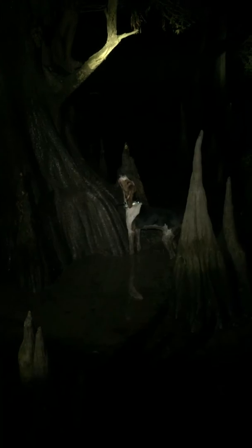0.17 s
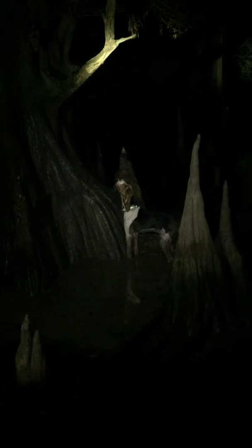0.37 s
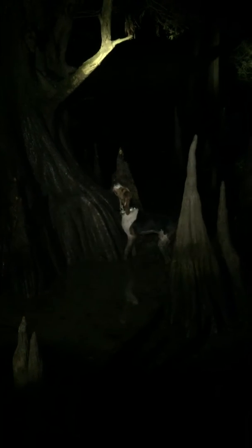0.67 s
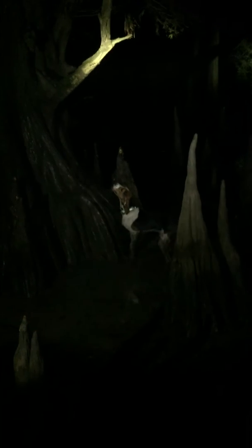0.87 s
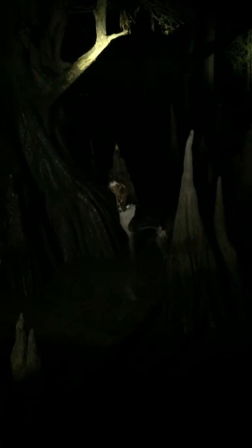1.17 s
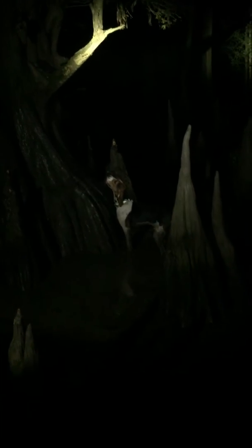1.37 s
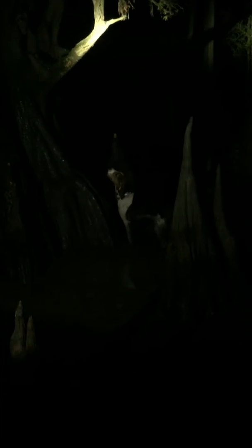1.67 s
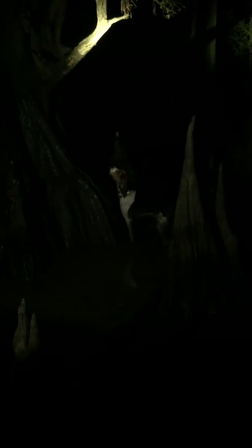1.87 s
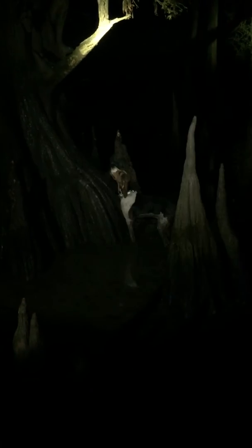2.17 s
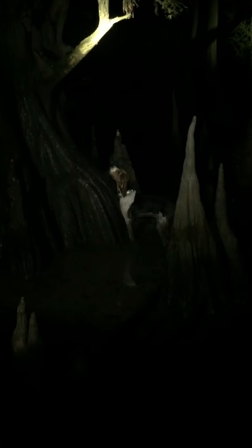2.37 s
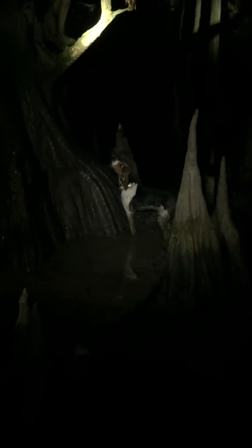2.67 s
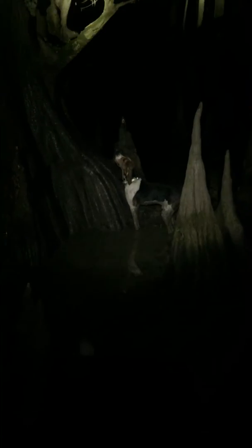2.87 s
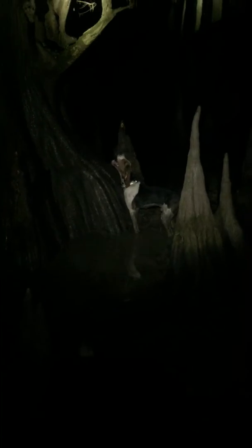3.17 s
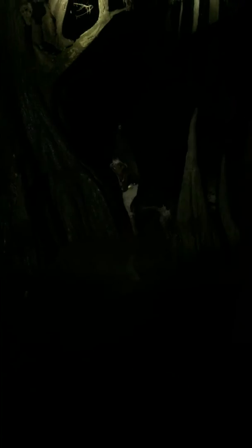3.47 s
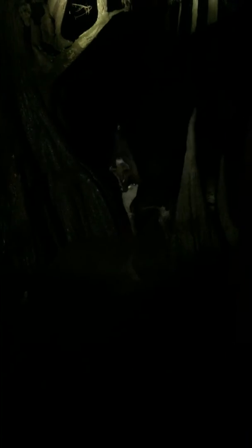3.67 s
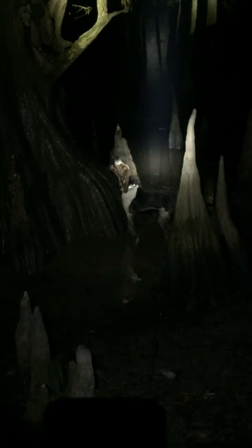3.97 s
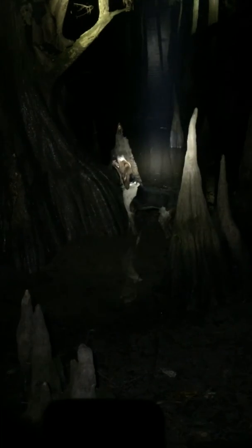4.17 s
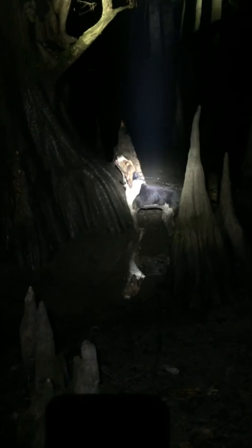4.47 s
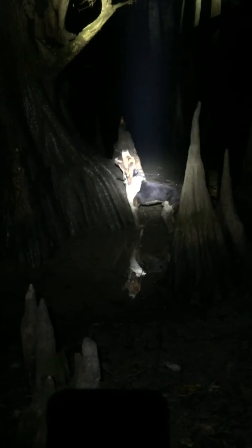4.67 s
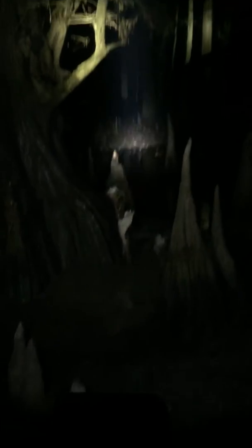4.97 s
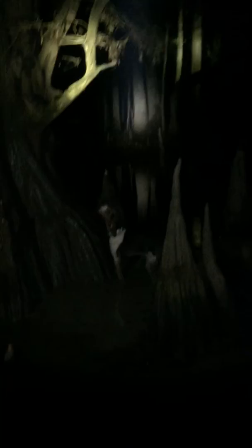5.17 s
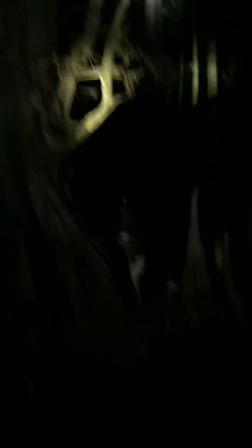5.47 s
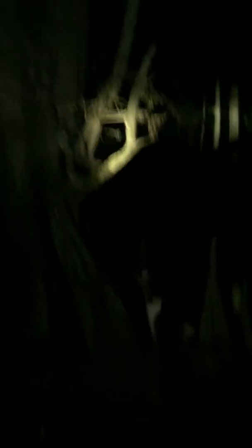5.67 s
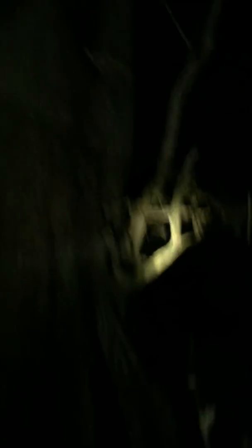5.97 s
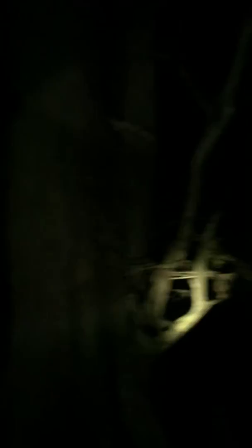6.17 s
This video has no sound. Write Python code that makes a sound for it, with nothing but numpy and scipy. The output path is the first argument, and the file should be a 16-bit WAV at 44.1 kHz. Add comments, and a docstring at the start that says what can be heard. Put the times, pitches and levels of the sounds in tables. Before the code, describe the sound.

Outdoors at night in flooded woods, a single hound is heard some metres from a simple mono microphone. A bark's echo dies away, a quiet wavering howl follows, then insects, air hiss and tiny ticks fill a pause. Five forceful barks come in the second half, unevenly spaced, each cracking into a rough shout-like body and a short falling groan, with echo washing through the trees and insects dipping beneath.

```python
"""Opens on an earlier bark's dying echo in a flooded forest at night, under insect bands, hiss, rumble and ticks.
A hound howls softly from 0.5 to 1.4 s, cracking between plain and period-doubled tone.
From 3 s, after a thin squeak, it barks five times: lead-in, crack, surge, arched hoarse body, short groan.
Vocal-fold harmonics and breath noise pass a mouth filter; decaying noise gives the echo of trunks and water.
Gain control ducks everything under loud barks and recovers steadily."""
import sys
import numpy as np
from scipy import signal
from scipy.fft import rfft, irfft
from scipy.io import wavfile
from scipy.ndimage import uniform_filter1d, minimum_filter1d

SR = 44100
rng = np.random.default_rng(int(sys.argv[2]) if len(sys.argv) > 2 else 0)


def master_out(mix):
    """Clip the mix to full scale and print it as 16-bit PCM to the path in sys.argv[1]."""
    frames = np.transpose(np.atleast_2d(mix))
    ceiling = np.clip(frames, -1, 1)
    pcm = np.round(ceiling * 32767).astype(np.int16)
    wavfile.write(sys.argv[1], SR, pcm)


N = 278640
TIME_S = np.arange(N) / SR

# Night-air hiss spectrum. Each row: frequency in Hz, relative density in dB per Hz.
AIR_SPECTRUM = [(100, 4), (550, -4.5), (900, -12.5), (1500, -17), (3000, -14), (6000, -17), (8000, -21.5),
                (15000, -28)]
# Low rumble spectrum. Each row: frequency in Hz, relative density in dB per Hz.
RUMBLE_SPECTRUM = [(20, -25), (50, -7), (85, 0.5), (140, -9), (280, -24.5), (600, -36.5), (2000, -73)]
# Rumble dying down. Each row: time in seconds, mean level in dB.
RUMBLE_LEVEL_DB = [(0, -58.5), (1.2, -60), (3, -59), (4.4, -61), (5.2, -66.5), (6.3, -74)]
# Insect choirs. Each row: centre in Hz, width in Hz, mean level in dB, wing-stroke pulsing depth (0-1).
INSECT_BANDS = [(2262, 190, -66, 0.1), (1810, 110, -78.5, 0.24), (3843, 212, -56.5, 0.11),
                (4605, 436, -61.5, 0.2), (9530, 490, -82, 0.87)]
# Nearer insect. Each row: time in seconds, level in dB.
NEAR_INSECT_DB = [(0, -78), (2.38, -92), (2.5, -55), (2.8, -56.5), (2.92, -80), (5.0, -73), (5.3, -50.5),
                  (5.6, -72)]
# Drops and small ticks. Each row: start in seconds, nominal peak in dB, ring in Hz, decay in seconds.
TICK_EVENTS = [(0.202, -50, 10340, 0.0015), (1.125, -45, 6620, 0.004), (1.231, -52.5, 8170, 0.0063),
               (1.66, -61, 6960, 0.0027), (2.23, -56, 5720, .004), (3.425, -47, 9900, .0015),
               (6.205, -43, 9000, 0.00051), (6.213, -37, 4900, 0.0013)]
# Forest echo filter. Each row: frequency in Hz, gain in dB.
FOREST_FILTER = [(150, -1.5), (380, -6.5), (600, -1.5), (780, -11.5), (1100, -3.5), (2000, -2), (3500, 2),
                 (6000, -5), (12000, -27)]
# Throat and mouth, wide open for a bark. Each row: frequency in Hz, gain in dB.
OPEN_MOUTH_FILTER = [(180, -51.5), (360, -16), (480, -14.5), (610, 2.5), (760, 3.5), (880, -6.5),
                     (1120, -3), (1330, -13), (1550, -7.5), (1850, -14.5), (2300, -32), (3000, -53),
                     (4200, -51.5), (15000, -101)]
# Throat and mouth, half closed for the howl. Each row: frequency in Hz, gain in dB.
HALF_CLOSED_FILTER = [(150, -25), (340, 0.5), (460, 2.5), (570, 4.5), (760, 3), (900, -10), (1130, -13),
                      (1400, -14.5), (1720, -1.5), (2200, -28), (3000, -25.5), (4500, -71), (12000, -83)]
# Air rushing past the teeth. Each row: frequency in Hz, gain in dB.
RUSH_FILTER = [(1500, -25.5), (2600, -17.5), (3100, -3), (3700, -19.5), (4500, -11.5), (5300, 4),
               (5900, -2), (6800, -4.5), (7900, -15), (8900, -8), (10000, -19), (11300, -13), (15000, -21)]
# Throat turbulence, weak near the main tone, strong above. Each row: frequency in Hz, gain in dB.
RASP_FILTER = [(400, -5), (750, -6.5), (1050, 0.5), (1900, 3), (2700, 7)]
# Howl. Each row: time in seconds, main-tone pitch in Hz, level in dB before HOWL_GAIN_DB.
HOWL_CURVE = [(0.47, 470, -41), (0.492, 481, -36.5), (0.506, 553.4, -33.5), (0.54, 572.6, -32.5),
              (0.572, 745, -35.5), (0.658, 774.4, -32.5), (0.754, 734, -37), (0.786, 686.3, -37.5),
              (0.862, 652.6, -33.5), (0.902, 637, -35), (0.954, 718, -41.5), (0.976, 553, -30.5),
              (1.192, 572, -30), (1.31, 561.6, -35.5), (1.33, 625, -33), (1.364, 540, -49),
              (1.41, 362.4, -49)]
# Howl register flips. Each row: centre in seconds, half-width in seconds, added hoarseness (0-1).
HOWL_CRACKS = [(0.541, 0.032, 0.82), (0.962, .013, 0.54), (1.34, 0.035, .55)]
# Barks. Each row: start in s, attack in s, lead-in length in s, surge delay after the crack in s,
# body length in s, lead-in pitch in Hz, crack pitch in Hz, top pitch in Hz, lead-in level in dB,
# surge level in dB, body level in dB before sag, last push in dB, lead-in hoarseness (0-1),
# body hoarseness (0-1), strength of the body's half-pitch lines (0-1).
BARK_EVENTS = [(3.014, 0.015, 0.047, 0.037, 0.16, 774.5, 659.2, 767, -16.5, 9, 12, 1, 0, 0.06, 1.),
               (3.719, 0.008, 0.039, .019, .132, 673.5, 624, 757.4, -0.5, 12, 10.5, -0.5, 0.23, 0.19, 0.66),
               (4.023, 0.051, .082, 0.03, .127, 611.3, 638, 734.4, -3, 2, 6.5, 0, .08, 0.03, 0.37),
               (4.702, 0.031, .046, 0.025, .130, 690.8, 655.3, 752.8, 0.5, 3, 9.5, -1, 0.67, 0.43, 0.76),
               (5.562, 0.0075, 0.038, 0.02, 0.15, 646.2, 623.4, 771.7, -2.5, 13, 9, 6.5, 0.74, 0.32, 0.92)]

TOP_HZ = 15750
HOWL_GAIN_DB, HOWL_HOARSE = -0.9, 0.053  # hoarseness between cracks
PLAIN_DOUBLING, DOUBLED_DOUBLING = 0.1, 1.19  # half-pitch strength in the two registers
LEAD_RISE = 0.1007  # share by which the lead-in pitch strains upward
# The voice cracks, falters, then climbs to the top pitch.
CRACK_S, RECOVER_S, CRACK_DB, CRACK_HOARSE = 0.01214, 0.034, -5, 0.96
BODY_DELAY_S, BODY_RISE_S = 0.011, 0.013
SURGE_S, SURGE_PURITY = 0.017, 0.65  # the hardest push clears the tone
SAG_DB_PER_S = 77  # the body loses force
PUSH_AHEAD_S, PUSH_S = 0.0055, 0.013  # last push before the jaw shuts
# The folds slacken before the close and the pitch slides down.
SLACK_AHEAD_S, SLACK_KNEE_S, SLACK_FALL_S = 0.021, 0.011, 0.1
# The jaw shuts on a short groan.
CLOSE_S, CLOSE_DB, TAIL_DB_PER_S, TAIL_S = 0.0037, -12, 169.5, 0.1
TAIL_HOARSE, TAIL_DOUBLING = 0.31, 0.9
GAP_DELAY_S, GAP_S, GAP_DB = 0.016, 0.011, -6.5  # dip between body and groan
# The falling groan swells as it passes the mouth's resonance.
GROAN_DELAY_S, GROAN_S, GROAN_DB = 0.026, 0.0078, 8


def amp(db):
    """Decibels to gain."""
    return 10 ** (np.asarray(db) / 20)


def unit(x):
    """Scale to rms 1."""
    return x / np.sqrt(np.mean(x ** 2))


def power(x, seconds):
    """Mean square, smoothed twice."""
    size = max(int(seconds * SR), 2)
    return np.maximum(uniform_filter1d(uniform_filter1d(x ** 2, size), size), 1e-14)


def bump(t_s, width_s):
    """Bell of height 1 around t = 0."""
    return np.exp(-(t_s / width_s) ** 2)


def step(t_s, width_s):
    """Smooth rise from 0 to 1 around t = 0."""
    return 0.5 + 0.5 * np.tanh(t_s / width_s)


def colour(x, points):
    """Minimum-phase filter through (Hz, dB) points."""
    hz, db = np.transpose(points)
    size = 2048
    bin_hz = np.arange(size // 2 + 1) * SR / size
    log_gain = np.log(amp(np.interp(np.log(bin_hz + 1), np.log(hz), db)))
    # folding the cepstrum makes the filter causal
    cepstrum = irfft(log_gain)
    cepstrum[1:size // 2] *= 2
    cepstrum[size // 2 + 1:] = 0
    impulse = irfft(np.exp(rfft(cepstrum)))
    return signal.fftconvolve(x, impulse)[:len(x)]


def band(count, hz, width_hz):
    """Bell-band noise, rms 1 before cropping to count; centred on 0 Hz it is a slow random wander."""
    f_hz = np.arange(N // 2 + 1) * SR / N
    spectrum = rfft(rng.standard_normal(N)) * bump(f_hz - hz, width_hz)
    return unit(irfft(spectrum, N))[:count]


def night_air():
    """A wavering low-noise rumble under steady filtered-noise hiss."""
    rumble_db = np.interp(TIME_S, *np.transpose(RUMBLE_LEVEL_DB)) + 4.3 * band(N, 0, 14.0)
    rumble = unit(colour(rng.standard_normal(N), RUMBLE_SPECTRUM)) * amp(rumble_db)
    hiss = unit(colour(rng.standard_normal(N), AIR_SPECTRUM)) * amp(-67.5)
    return rumble + hiss


def insects(stroke_hz):
    """Many far insects blur into noise bands pulsed by wing strokes, one band deeply; a nearer one joins."""
    wandering_hz = stroke_hz * (1 + 0.0044 * band(N, 0, 5.1))
    stroke = np.cos(2 * np.pi * np.cumsum(wandering_hz) / SR)
    out = amp(np.interp(TIME_S, *np.transpose(NEAR_INSECT_DB))) * band(N, 3680, 200)
    for hz, width_hz, db, depth in INSECT_BANDS:
        choir = unit(band(N, hz, width_hz) * np.exp(depth * stroke))
        out = out + amp(db + 0.85 * band(N, 0, 2.7)) * choir
    return out


def ticks():
    """Each tick is a short burst of bright noise, sudden then decaying."""
    out = 0
    for start_s, peak_db, hz, decay_s in TICK_EVENTS:
        decay = np.exp(-np.abs(TIME_S - start_s) / decay_s) * (TIME_S >= start_s)
        # rms at half the nominal peak
        out = out + amp(peak_db) / 2 * band(N, hz, 2500) * decay
    return out


def forest(x, near_db, near_t60_s, far_db, far_t60_s):
    """Quick scatter from nearby trunks and the long wash of the whole wood, as decaying noise."""
    t_s = TIME_S[:3 * SR]
    near_decay = amp(-60 * t_s / near_t60_s) * (t_s > 0.006)
    far_decay = amp(-60 * t_s / far_t60_s) * (1 - np.exp(-t_s / 0.028))
    near = unit(rng.standard_normal(len(t_s)) * near_decay)
    far = unit(rng.standard_normal(len(t_s)) * far_decay)
    echo = colour(amp(near_db) * near + amp(far_db) * far, FOREST_FILTER)
    return signal.fftconvolve(x, echo / np.sqrt(len(t_s)))  # rings on past the end


def squeak(start_s, length_s, low_hz, high_hz, db):
    """A thin rising, unsteady sine that leads into the first bark."""
    progress = np.clip((TIME_S - start_s) / length_s, 0, 1)
    hz = low_hz + (high_hz - low_hz) * progress + 40 * band(N, 0, 200)
    return amp(db) * np.sin(np.pi * progress) * np.sin(2 * np.pi * np.cumsum(hz) / SR)


def voice(table, mouth, jitter, shimmer, rattle, rattle_hz, rasp_db, clear_rasp_db,
          bite_db, rush_db, closing_s, chest_db):
    """Uneven vocal-fold cycles and gated turbulence through the mouth, plus rushing air and a chest tone."""
    s, *columns = np.transpose(table)
    start, count = int(s[0] * SR), int((s[-1] - s[0]) * SR)
    t_s = TIME_S[:count]
    hz, db, hoarse, doubling = (np.interp(TIME_S[start:start + count], s, c) for c in columns)
    hoarse, doubling = np.clip(hoarse, 0, 1), np.abs(doubling)
    doubled = np.minimum(doubling, 1)

    # loose tissue rattles at its own slow rate and puts sidebands on every line
    flap_hz = rattle_hz * (1 + 0.095 * band(count, 0, 33))
    flap = np.cos(2 * np.pi * np.cumsum(flap_hz) / SR)
    hoarse_wobble = hoarse * (jitter * band(count, 0, 260) + 0.0075 * flap)
    hz = hz * (1 + hoarse_wobble + 0.0066 * band(count, 0, 50))
    phase = np.pi * np.cumsum(hz) / SR  # one turn per pair of cycles

    # strong and weak cycles alternate: odd k are the half-pitch lines
    closure = 0.81 + 0.068 * doubled
    folds = 0
    for k in range(1, 13):
        line_gain = doubling if k % 2 else closure ** (k / 2 - 1)
        folds = folds + line_gain * np.cos(k * phase)
    folds = folds * np.exp(hoarse * (rattle * flap + shimmer * band(count, 0, 380)))
    air = rng.standard_normal(count) * (1 + 0.28 * np.cos(phase)) * np.exp(0.5 * hoarse * flap)
    rasp = (amp(clear_rasp_db) + amp(rasp_db) * hoarse) * colour(air, RASP_FILTER)
    tone = colour(folds + rasp, mouth)
    tone = amp(db) * tone / np.sqrt(power(tone, 0.01))

    # the jaw starts wide for a harsh bite; as it closes, air buzzes past the teeth
    gape = bump(t_s, closing_s)
    bite = band(count, 2420, 1000) * amp(db + bite_db) * hoarse * gape
    buzz = unit(sum(np.cos(k * phase + 2 * np.pi * rng.random()) for k in range(7, 34)))
    loudest_db = db.max()
    effort_db = db - loudest_db
    rush = unit(colour(air * (0.9 + hoarse) + buzz * np.exp(0.55 * hoarse * flap), RUSH_FILTER))
    rush = rush * amp(loudest_db + rush_db + 1.016 * effort_db + 2.2 * band(count, 0, 45))
    rush = rush * (1.2 - gape) * (0.39 + 0.98 * doubled)

    # the chest tone stands out as the voice sinks away
    chest_level_db = loudest_db + chest_db + 0.35 * effort_db + 3.7 * band(count, 0, 40)
    chest = np.sin(phase) * doubled * amp(chest_level_db)
    fade = np.minimum(t_s / 0.002, 1) * np.minimum(t_s[::-1] / 0.03, 1)
    return np.pad((tone + bite + rush + chest) * fade, (start, N - start - count))


def howling():
    """Howl motion, hoarse around each register flip: rows of (s, Hz, dB, hoarseness, half-pitch strength)."""
    times_s, hz, db = np.transpose(HOWL_CURVE)
    s = np.arange(times_s[0], times_s[-1], 0.001)
    hoarse, doubled = HOWL_HOARSE, 0
    for k, (at_s, width_s, added) in enumerate(HOWL_CRACKS):
        hoarse = hoarse + added * bump(s - at_s, width_s)
        doubled = doubled + (-1) ** k * step(s - at_s, width_s / 2)
    doubling = PLAIN_DOUBLING + (DOUBLED_DOUBLING - PLAIN_DOUBLING) * doubled
    level_db = np.interp(s, times_s, db) + HOWL_GAIN_DB
    return np.column_stack([s, np.interp(s, times_s, hz), level_db, hoarse, doubling])


def bark(start_s, attack_s, lead_s, surge_delay_s, body_s, lead_hz, crack_hz, top_hz,
         lead_db, surge_db, body_db, push_db, lead_hoarse, body_hoarse, body_doubling):
    """Motion of one bark from lead-in to groan, in the howl's columns."""
    s = np.arange(start_s, start_s + lead_s + body_s + TAIL_S, 0.001)
    since_start = s - start_s
    since_crack = since_start - lead_s
    since_close = since_crack - body_s
    opened, closed = step(since_crack, CRACK_S / 2), step(since_close - CLOSE_S, CLOSE_S)
    surge = bump(since_crack - surge_delay_s, SURGE_S)
    push = bump(since_close + PUSH_AHEAD_S, PUSH_S)

    # pitch strains upward, drops at the crack, climbs to the top and slides away
    strained_hz = lead_hz * (1 + LEAD_RISE * (since_start / lead_s) ** 2)
    held_hz = np.where(since_crack < 0, strained_hz, top_hz)
    dip = np.exp(-(since_crack / np.where(since_crack < 0, CRACK_S, RECOVER_S)) ** 4)
    slack_s = SLACK_KNEE_S * np.logaddexp(0, (since_close + SLACK_AHEAD_S) / SLACK_KNEE_S)
    hz = (held_hz + (crack_hz - held_hz) * dip) * np.exp(-slack_s / SLACK_FALL_S)

    # the lead-in swells, the surge rides on the sagging body, the jaw cuts it off
    lead = amp(lead_db - 27.6 * np.maximum(1 - since_start / attack_s, 0)) * (1 - opened)
    body = amp(body_db - SAG_DB_PER_S * since_crack) * step(since_crack - BODY_DELAY_S, BODY_RISE_S)
    release_db = CLOSE_DB * closed - TAIL_DB_PER_S * np.maximum(since_close, 0)
    release_db = release_db + GAP_DB * bump(since_close - GAP_DELAY_S, GAP_S)
    accents_db = CRACK_DB * bump(since_crack, CRACK_S) + push_db * push
    accents_db = accents_db + GROAN_DB * bump(since_close - GROAN_DELAY_S, GROAN_S)
    db = 20 * np.log10(lead + body + amp(surge_db) * surge) + accents_db + release_db

    def blend(first, middle, last):
        """Cross-fade lead-in, body and groan."""
        return first * (1 - opened) + middle * (opened - closed) + last * closed

    # surge and last push clear the tone; a hoarse lead-in already has half-pitch lines
    impure = 1 - SURGE_PURITY * np.maximum(surge, push)
    hoarse = blend(lead_hoarse, body_hoarse, TAIL_HOARSE) + CRACK_HOARSE * bump(since_crack, CRACK_S)
    doubling = blend(0.57 * lead_hoarse, body_doubling, TAIL_DOUBLING)
    doubling = doubling * (1 - 0.51 * np.maximum(dip * opened, push))
    return np.column_stack([s, hz, db, hoarse * impure, doubling])


def hound():
    """Howl, barks and echoes; the late echo also opens the scene as an earlier bark dying away."""
    howl = voice(howling(), HALF_CLOSED_FILTER, jitter=0.14, shimmer=0.64, rattle=0.47, rattle_hz=90,
                 rasp_db=-21.5, clear_rasp_db=-8.0, bite_db=-9, rush_db=-38.5,
                 closing_s=0.051, chest_db=-8)
    barks = 0
    for row in BARK_EVENTS:
        barks = barks + voice(bark(*row), OPEN_MOUTH_FILTER, jitter=0.07, shimmer=0.79, rattle=0.78,
                              rattle_hz=131.5, rasp_db=17.5, clear_rasp_db=-7.5, bite_db=-25.5,
                              rush_db=-36.5, closing_s=0.061, chest_db=-45.5)
    echoes = forest(howl + barks, near_db=-6, near_t60_s=0.19, far_db=-25.5, far_t60_s=2.09)
    earlier = np.pad(echoes[int(6.0 * SR):], (0, N))[:N]
    return howl + barks + echoes[:N] + amp(-2.0) * earlier


def scene():
    """Air, insects, ticks and dog, in mono."""
    background = night_air() + insects(stroke_hz=58.3) + ticks()
    dog = squeak(start_s=2.982, length_s=0.044, low_hz=3840, high_hz=4050, db=-37.5) + hound()
    return (background + dog)[None]


def overload(x, ceiling_db):
    """Flattens the loudest peaks, the upper side slightly earlier, which adds a low thump."""
    ceiling = amp(ceiling_db) * np.where(x > 0, 0.95, 1.05)
    return x / (1 + (x / ceiling) ** 8) ** (1 / 8)


def gain_control(x, threshold_db, slope, release_db_per_s, start_cut_db):
    """Turns down at once when the sound is loud and recovers at a steady rate."""
    loudness_db = 10 * np.log10(power(x, 0.004))
    wanted_db = np.clip(slope, 0, 1) * np.maximum(loudness_db - threshold_db, 0)
    recovery_db = release_db_per_s * TIME_S
    held_db = np.maximum(np.maximum.accumulate(wanted_db + recovery_db), start_cut_db)
    return x * amp(recovery_db - held_db)


def limiter(x, ceiling):
    """Looks a few milliseconds ahead and holds the peaks under the ceiling."""
    size = 200  # samples
    gain = minimum_filter1d(ceiling / np.maximum(np.abs(x), ceiling), size)
    return x * uniform_filter1d(gain, size)


def record(dry):
    """Microphone overload, bass roll-off, gain control, limiter and top cut."""
    x = overload(dry[0], ceiling_db=17.0)
    x = signal.sosfilt(signal.butter(1, 25, "high", fs=SR, output="sos"), x)
    x = gain_control(x, threshold_db=-17, slope=0.59, release_db_per_s=23.5, start_cut_db=3.5)
    x = limiter(x, ceiling=0.72)
    return signal.sosfilt(signal.ellip(10, 0.2, 80, TOP_HZ, fs=SR, output="sos"), x)[None]


dry = scene()
out = record(dry)
master_out(out)
```